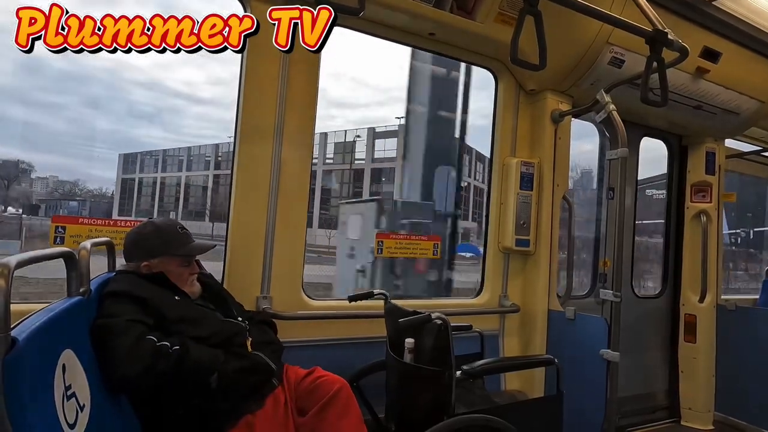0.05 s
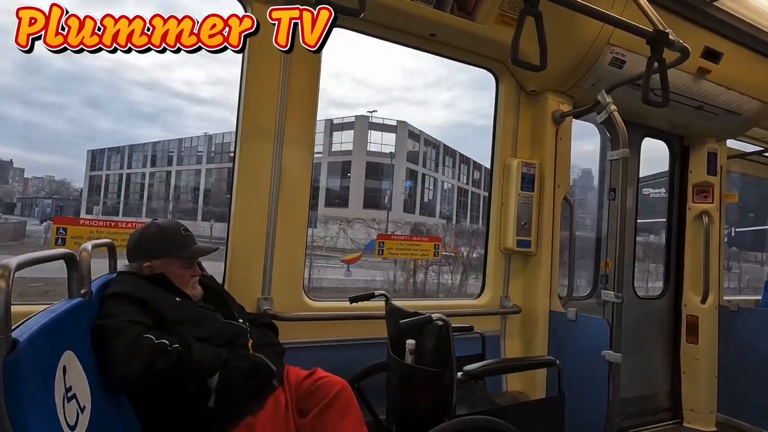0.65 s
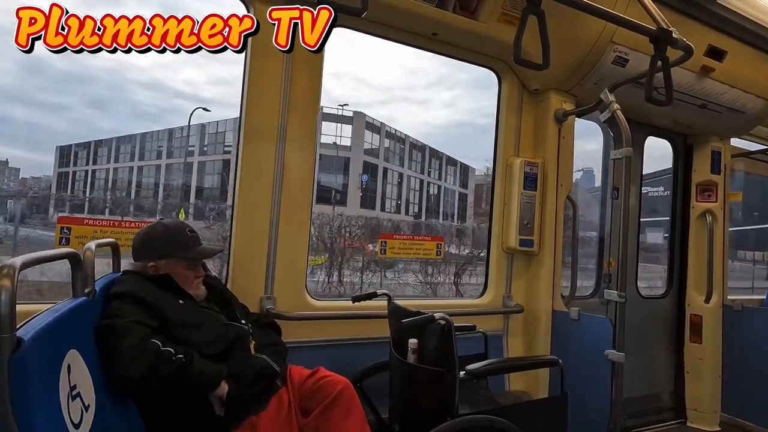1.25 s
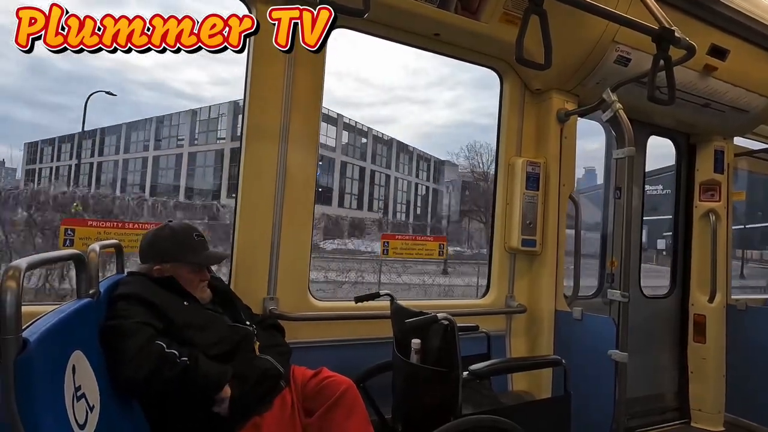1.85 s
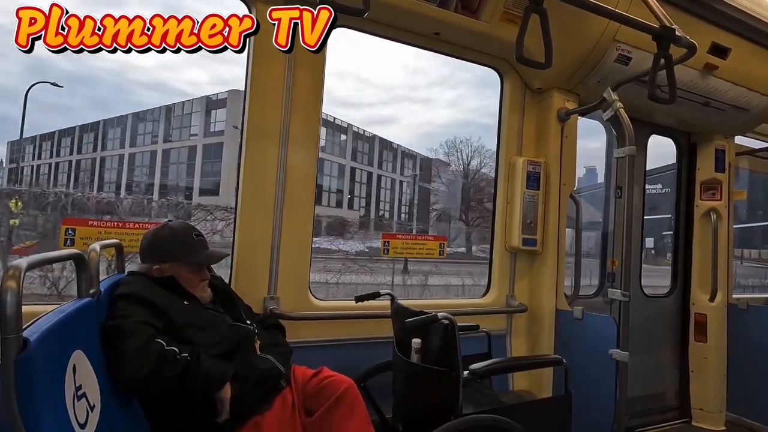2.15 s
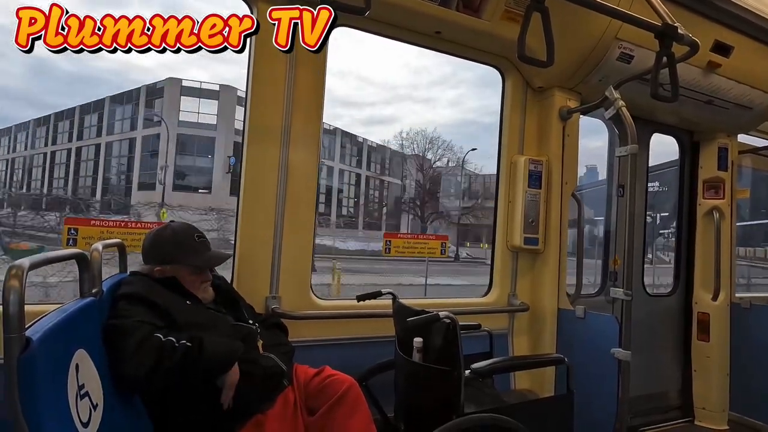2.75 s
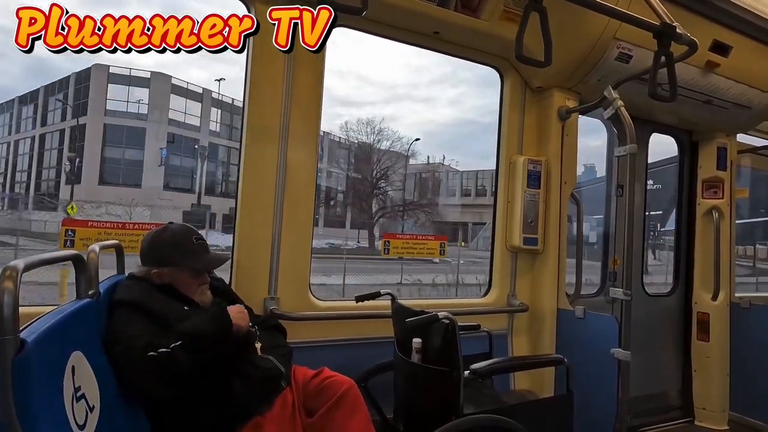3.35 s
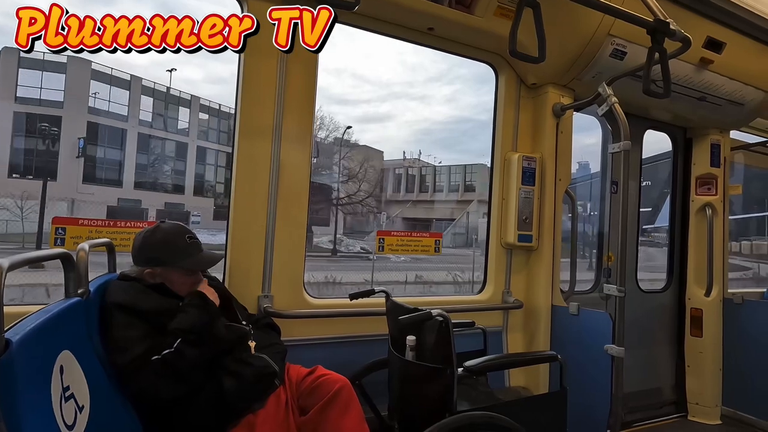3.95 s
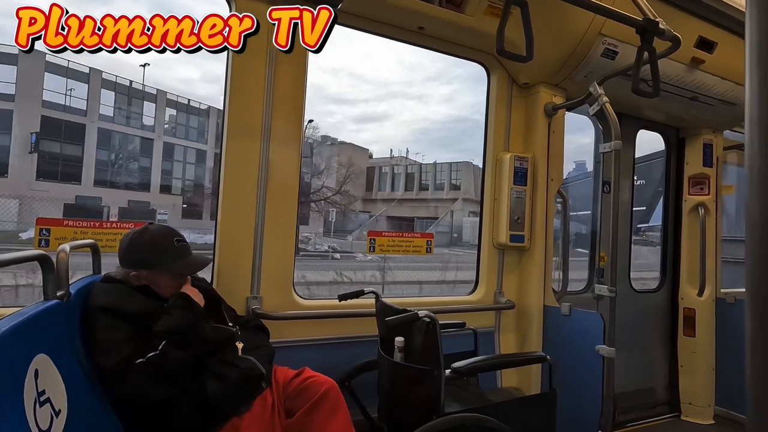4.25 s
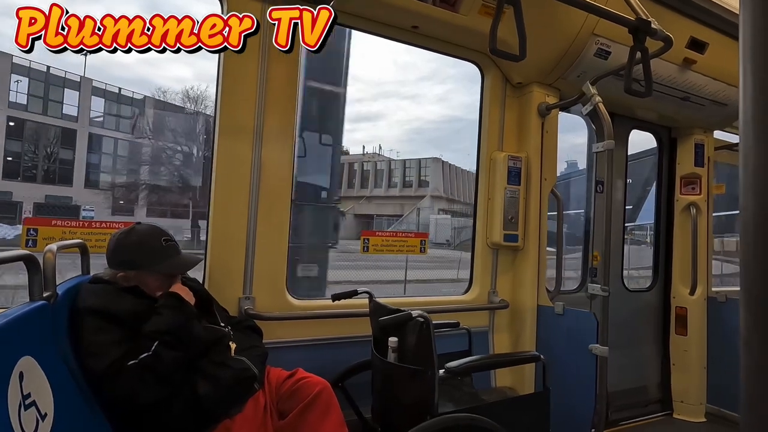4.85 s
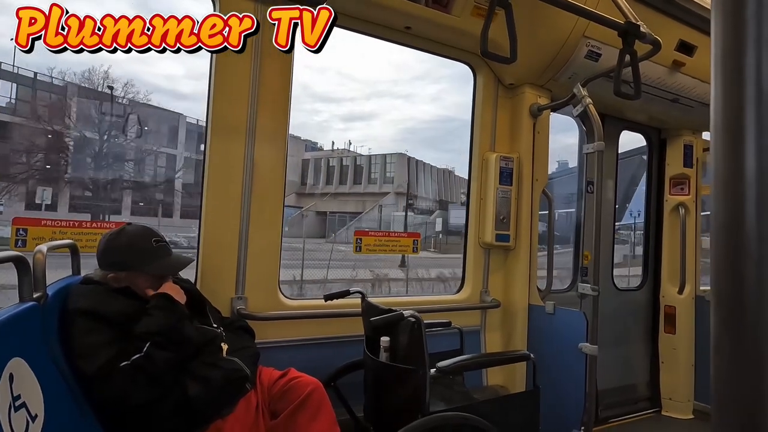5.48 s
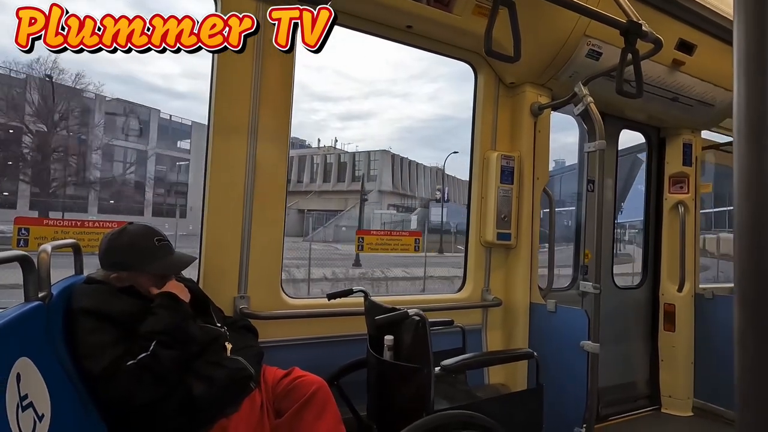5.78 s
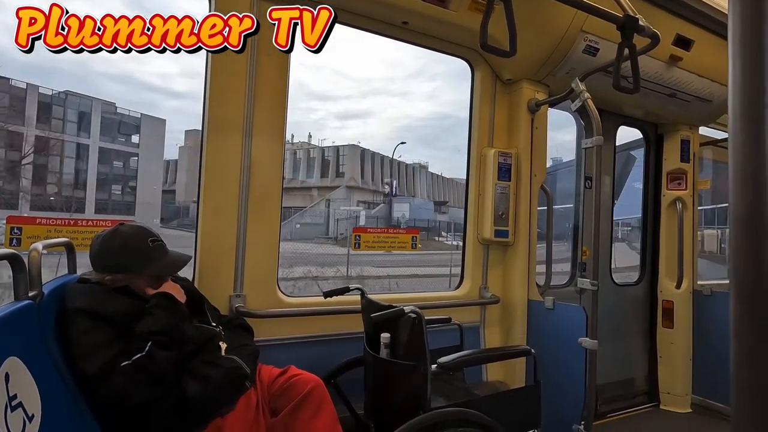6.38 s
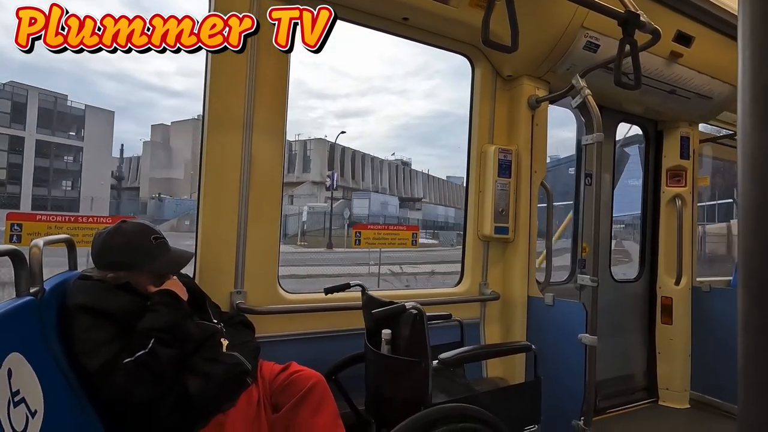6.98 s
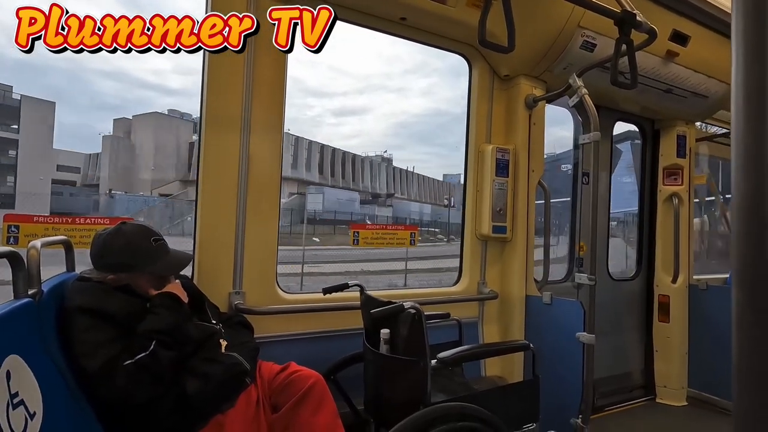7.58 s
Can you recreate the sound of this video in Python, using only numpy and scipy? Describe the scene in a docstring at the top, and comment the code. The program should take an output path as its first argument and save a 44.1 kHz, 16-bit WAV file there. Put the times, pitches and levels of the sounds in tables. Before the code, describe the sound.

A light rail car runs at steady speed, heard in stereo from inside the cabin. A deep, slowly swelling boom and rumble fills the whole stretch, with the roar and hiss of wheels on rails and a very faint, thin drive whine. From about 0.1 to 1.1 seconds loose fittings clack and rattle sharply, with small metal clinks around 0.3 seconds and the strongest knock, along with a floor thump, near 0.9. The trim gives a tiny squeak at 1.5 seconds and again near 5.6. The wheels cross rail joints in groups, each a clunk with a surge of roar, brief clatter and slight ring, at about 2.4 to 2.8, 4.1 to 4.4, 5.2 to 5.4 and 6.8 to 7.3 seconds. Dull floor thumps cluster around 3.6 to 3.9 and recur between 5.4 and 6.7. The rumble continues to the end, at about 7.6 seconds.

```python
"""Loose fittings clack and clink for a second over the deep boom of a light rail car at steady speed,
heard from a pair of microphones inside the cabin. The car body booms at two low resonances. Under the
floor the wheels roar, hiss and ring on the rails, surging and clunking as each axle crosses a joint,
and the drive whines faintly. Now and then a jolt thumps the floor or the trim gives a small squeak."""
import sys
import numpy as np
from scipy import signal
from scipy.fft import rfft, irfft, next_fast_len
from scipy.io import wavfile
from scipy.ndimage import uniform_filter1d

SR = 44100
rng = np.random.default_rng(int(sys.argv[2]) if len(sys.argv) > 2 else 0)


def digitize_waveform(pressure):
    """Quantize a signal to 16-bit integers and store it at the path in sys.argv[1].

    Rows of a 2-D input are taken as channels; values are limited to [-1, 1].
    """
    field = np.atleast_2d(pressure).T
    bounded = np.clip(field, -1, 1)
    quanta = np.round(bounded * 32767).astype(np.int16)
    wavfile.write(sys.argv[1], SR, quanta)


N = 336042
TIME = np.arange(N) / SR
JOINT_RISE_S, USUAL_ROAR_DB = 0.017, -35

# Roughness of the track between joints. Each row: time in seconds, then floor rumble, rail roar and
# contact hiss in dB. Levels in all tables are relative, ahead of each source's own gain.
TRACK_ROUGHNESS = [(0, -27, -32.5, -45), (0.6, -28, -33, -45), (1.1, -28, -34, -46.5),
                   (1.5, -27, -31.5, -42.5), (1.95, -39, -35, -46), (2.2, -29.5, -36, -49.0),
                   (2.75, -33, -35.5, -45.5), (3.05, -38.5, -37.5, -50), (3.5, -34.5, -37, -50),
                   (3.9, -30, -34.5, -46.5), (4.55, -31.5, -34, -47.0), (4.8, -33, -34.5, -47),
                   (5.05, -30.5, -34, -46.5), (5.65, -27.5, -34, -45), (6, -31, -36.5, -48.5),
                   (6.35, -25.5, -34, -46), (6.6, -28, -34, -48.5), (6.9, -27.5, -32, -40.5),
                   (7.4, -32.5, -35, -45.5), (7.62, -31, -40.5, -50)]
# Axles crossing rail joints. Each row: start in seconds, clunk in dB, its pitch in Hz, roar in dB,
# wheel ring in dB, its pitch in Hz, its hold in seconds, hiss in dB.
RAIL_JOINTS = [(2.372, -24.5, 254, -35, -41, 924, 0.23, -41),
               (2.583, -27.5, 280, -37.5, -37.5, 933, 0.054, -41),
               (2.78, -38.5, 252, -54, -50, 930, 0.058, -49),
               (4.135, -34, 340, -34.5, -44, 964, 0.03, -41.5),
               (4.345, -28.5, 295, -38.5, -37, 926, 0.05, -44),
               (5.165, -23.5, 213, -36.5, -39, 952, .13, -44.5),
               (5.368, -25, 237, -30.5, -41.5, 916, .12, -42.5),
               (6.18, -40, 250, -44, -54, 957, .04, -51.5), (6.37, -41, 254, -51, -55, 970, 0.058, -47),
               (6.84, -26, 254, -33.5, -36, 970, 0.05, -38),
               (6.934, -38, 300, -35, -42.5, 890, 0.13, -41.5),
               (7.05, -28.5, 304, -31.5, -38.5, 920, 0.04, -37),
               (7.245, -28.5, 215, -33, -38.5, 950, 0.056, -37.5)]


def body_boom():
    """All round the microphones the car shell swings at its two lowest resonances, with wandering phase."""
    # The shell's resonances. Each row: frequency in Hz, width in Hz.
    shell_modes = [(28.4, 7.3), (56.8, 11.8)]
    # Slow swell of each resonance. Each row: time in seconds, level in dB.
    lower_swell = [(0.0, -25), (0.12, -21.5), (1.43, -18), (1.64, -11.5), (2.18, -23.5), (2.8, -13),
                   (3.29, -26), (3.49, -18), (3.65, -20.5), (4.07, -14), (4.72, -22), (4.85, -26),
                   (5.05, -19), (5.44, -21), (5.61, -17.5), (6.58, -19.5), (7.45, -15), (7.62, -30.5)]
    upper_swell = [(0.0, -23), (0.22, -27), (0.6, -26.5), (1.56, -34.5), (1.72, -23), (1.92, -18.5),
                   (2.1, -24), (2.45, -18.5), (2.7, -21.5), (2.8, -28), (3.1, -22), (3.4, -23), (3.53, -29),
                   (3.65, -26), (4.02, -22), (4.46, -18.5), (4.58, -30), (4.93, -26), (5.05, -20.5),
                   (5.32, -14.5), (5.45, -24.5), (5.6, -21), (6.07, -29.5), (6.2, -17.5), (6.6, -24.5),
                   (6.75, -28.5), (6.88, -16.5), (7.28, -17), (7.42, -27.5), (7.62, -24)]
    looseness = 0.51  # the looser, the deeper the swing dips as its phase slips
    out = np.zeros((2, N))
    for (hz, width), swell in zip(shell_modes, (lower_swell, upper_swell)):
        mode = [(hz, width, 0)]
        swing = signal.hilbert(resonant(rng.standard_normal(N), mode))
        swing = unit_rms(swing.real / np.sqrt(abs(swing) ** 2 + looseness))
        side = gain_of(-45.5) * resonant(rng.standard_normal(N), mode)
        level_db = curve(swell) - 0.97 + 2.5 * drift(11.2)
        out += gain_of(level_db) * np.array([swing + side, swing - side])
    return out


def rolling():
    """Rough rail and joints shake the floor and roar through the shell; panels drone and wheels sing."""
    # Spectra of floor rumble, rail roar and the crash at a joint. Each row: frequency in Hz, level in dB.
    rumble_spectrum = [(39, -32.5), (66, -3.5), (86, -7), (108, -7.5), (250, -17.5), (320, -62.5),
                       (550, -120)]
    roar_spectrum = [(120, -5.5), (210, 1.5), (257, -6), (285, -2), (320, -4.5), (419, -8.5), (491, -7),
                     (555, -12), (667, -8), (734, -14.5), (837, -14), (954, -17.5), (1060, -14),
                     (1700, -27), (2210, -38), (3740, -120)]
    crash_spectrum = [(120, -14), (250, -2), (490, 2), (650, -4.5), (800, -6), (1200, -9.5), (1700, -23.5),
                      (3700, -52.5)]
    # Wall panel and wheel resonances. Each row: frequency in Hz, width in Hz, level in dB.
    panel_modes = [(260, 9.2, 0), (322.8, 55, -1), (479, 103, -9), (1370, 230, -13)]
    wheel_modes = [(908.5, 30, 0.5), (944.5, 26, 1.5), (987, 24, 0.5)]
    # Swell of the droning panels. Each row: time in seconds, level in dB.
    panel_swell = [(0, -35.5), (0.6, -39.5), (1.3, -39), (1.8, -34), (2.15, -43), (2.7, -34.5), (3.1, -46),
                   (3.55, -45.5), (3.95, -40.5), (4.4, -40.5), (4.8, -34.5), (5.1, -40), (5.6, -40),
                   (6.0, -42), (6.35, -39), (6.6, -42), (6.95, -37.5), (7.62, -45)]
    thuds = joint_surges(column=3)
    shake = np.hypot(roughness(column=1, patchy_db=2), gain_of(1) * thuds)
    rough = roughness(column=2, patchy_db=0.5)
    rumble = steadied(coloured(diffuse(N), rumble_spectrum), 0.043) * gain_of(0.3)
    roar = steadied(coloured(diffuse(N), roar_spectrum), 0.026) * gain_of(-0.75)
    crash = steadied(coloured(diffuse(N), crash_spectrum), 0.048)
    panels = steadied(resonant(diffuse(N), panel_modes), 0.2)
    panels *= gain_of(curve(panel_swell) + 1.3 * drift(30))
    wheels = steadied(resonant(diffuse(N), wheel_modes), 0.11)
    wheels *= gain_of(-50 + extra_roar_db() + 1.6 * drift(9))
    return rumble * shake + roar * rough + crash * thuds + panels + wheels


def joint_clunks():
    """At each joint the bogie clunks and the wheel rings, at a pitch that differs from blow to blow."""
    ring_lead_s = 0.012  # the wheel starts to sing just before it drops into the gap
    clunk_width_hz, ring_width_hz = 122, 84
    out, t = np.zeros((2, N)), np.arange(SR // 2) / SR
    for start, clunk_db, clunk_hz, _, ring_db, ring_hz, ring_hold_s, _ in RAIL_JOINTS:
        clunk = steadied(resonant(diffuse(len(t)), [(clunk_hz, clunk_width_hz, 0)]), 0.016)
        clunk *= jolt(t, JOINT_RISE_S, hold_s=0.011, t60=0.39)
        ring = steadied(resonant(diffuse(len(t)), [(ring_hz, ring_width_hz, 0)]), 0.043)
        ring *= jolt(t, JOINT_RISE_S, ring_hold_s, t60=0.28)
        add(out, start, gain_of(clunk_db) * clunk)
        add(out, start - ring_lead_s, gain_of(ring_db) * ring)
    return out


def gear_clatter():
    """Each joint shakes the running gear into a quick, uneven clatter under the floor."""
    # Resonances of the running gear. Each row: frequency in Hz, width in Hz, level in dB.
    gear_modes = [(560, 180, 0), (870, 250, 0), (1230, 260, -1.5), (1650, 380, -7), (2380, 550, -9)]
    taps_per_s, tap_t60 = 90, 0.088
    taps = (rng.random(N) < taps_per_s / SR) * gain_of(1.5 * rng.uniform(-1.1, 1, N))
    power_decay = gain_of(-60 / (tap_t60 * SR)) ** 2
    tap_power = signal.lfilter([1], [1, -power_decay], taps ** 2)
    clatter = unit_rms(np.sqrt(tap_power)) * resonant(diffuse(N), gear_modes)
    return gain_of(-10) * joint_surges(column=3) * clatter


def contact_hiss():
    """Steel on steel hisses, and grows brighter and grittier as it rubs harder."""
    # Spectra of the hiss and its grit. Each row: frequency in Hz, level in dB.
    hiss_spectrum = [(740, -8), (1250, -3.5), (1400, -2), (1710, -2), (4820, -14.5), (7350, -27),
                     (8550, -32), (12300, -41.5), (13900, -59.5)]
    grit_spectrum = [(1500, -21.5), (4000, 2), (7300, 4.5), (9000, -8), (10800, -12.5),
                     (12400, -12.5), (14000, -29.5)]
    scrapes = joint_surges(column=7, rise_s=0.037, t60=0.8)  # slower to swell than the clunk
    rub_db = 20 * np.log10(np.hypot(roughness(column=3, patchy_db=-0.65), scrapes))
    hiss = coloured(diffuse(N), hiss_spectrum) * gain_of(rub_db + 1 + 0.5 * drift(25))
    grit = coloured(diffuse(N) * gain_of(1.7 * drift(300)), grit_spectrum)
    return hiss + grit * gain_of(-57.5 + 1.7 * (rub_db + 41))


def fitting_clacks():
    """Loose fittings knock in the cabin: each a crack, a short uneven rattle and their echo."""
    # The knocks. Each row: start in seconds, level in dB, tilt in dB per octave, ringing band in Hz,
    # its boost in dB, rattle t60 in seconds.
    knocks = [(0.1147, -19.5, 4, 4600, 4.5, 0.023), (0.1228, -20, -2, 3000, 2, 0.16),
              (0.2125, -24, 1.5, 3660, -1, 0.022), (0.2834, -19.5, 1, 1960, -5, 0.06),
              (.3288, -25.5, 3, 1378, -10, 0.05), (0.3557, -23.5, -0.5, 1136, -1, 0.07),
              (0.4023, -22.5, 1.5, 2860, 4, 0.016), (0.7293, -32, -1, 4200, 1, 0.072),
              (0.7579, -31.5, 2, 4630, 11, 0.07), (0.8883, -16, -2.8, 1900, 4.5, 0.049),
              (.8970, -17.5, 2, 2620, 11.5, 0.13), (0.929, -21, -1, 2400, 7, 0.38),
              (1.0323, -18.5, -0.5, 3080, 4.5, 0.1), (1.178, -33.5, -4, 4000, 7, .06)]
    # Spectrum common to all knocks. Each row: frequency in Hz, level in dB.
    knock_spectrum = [(150, -15), (400, 3), (800, 2.5), (1400, 6), (2800, 1.5), (4500, -2), (7000, -12),
                      (9000, -16), (11000, -24.5), (12200, -26.5), (15000, -45)]
    # Resonances of the knocked panel. Each row: frequency in Hz, width in Hz, boost in dB.
    panel_peaks = [(950, 32, 10), (1390, 60, 3), (1794, 30, 4), (2140, 49, 4.5), (2770, 45, 5),
                   (3210, 60, 6), (4400, 100, 1), (4760, 110, 2)]
    out, t = np.zeros((2, N)), np.arange(SR // 2) / SR
    hz = np.fft.rfftfreq(len(t), 1 / SR)
    attack, snap = 1 - np.exp(-t / 0.00013), 0.21 * np.exp(-t / 0.0023)
    panel_db = sum(boost / (1 + (2 * (hz - centre) / width) ** 2) for centre, width, boost in panel_peaks)
    bounce = gain_of(1.5 * drift(170))  # a fitting bounces unevenly in its seat
    for start, db, tilt_db, band_hz, boost_db, t60 in knocks:
        band_db = boost_db * np.exp(-(np.log2((hz + 1) / band_hz) / 0.75) ** 2)
        slope_db = tilt_db * np.log2((hz + 100) / 3000)
        colour = gain_of(at_hz(knock_spectrum, hz) + slope_db + band_db + panel_db)
        near, far = (irfft(rfft(diffuse(len(t))) * colour, len(t)) for _ in range(2))
        rattle = bounce[round(start * SR):][:len(t)] * gain_of(-60 * t / t60)
        crack = unit_rms(near * attack * (rattle + snap))
        add(out, start, gain_of(db - 21) * crack + gain_of(db - 17) * echo_tail(far))
    # the knocks come from one direction, a touch to the left, so both microphones hear them more alike
    mid = out.mean(0)
    return (mid + 0.76 * (out - mid)) * gain_of([[0.3], [-0.3]])


def metal_clinks():
    """A loose metal part rings while it chatters in its seat, which blurs each mode into a narrow band."""
    # The lowest note depends on where the part lands. Each row: start in seconds, level in dB,
    # lowest note in Hz, that note against the rest in dB, tilt in dB per octave.
    landings = [(0.2834, -36, 1534, 10, 1.5), (0.2874, -37, 1947, 10, 3), (0.3288, -22.5, 1377, 3, 0.5),
                (0.3557, -26.5, 1137, -10, -6.5), (0.385, -30, 1320, -15, -9)]
    # The part's upper modes. Each row: frequency in Hz, width in Hz, level in dB, t60 in seconds.
    upper_modes = [(3545, 8, -1.5, 0.25), (3630, 88, -4, 0.078), (3850, 140, -9, 0.05),
                   (5150, 150, -13, 0.04), (5860, 60, -12, 0.08), (6240, 40, -15, 0.15),
                   (7000, 260, -7.5, 0.072), (7600, 150, -18, 0.05)]
    low_width_hz, low_t60 = 13, 0.12
    out, t = np.zeros((1, N)), np.arange(SR // 3) / SR
    for start, db, low_hz, low_db, tilt_db in landings:
        for hz, width, mode_db, t60 in upper_modes + [(low_hz, low_width_hz, low_db, low_t60)]:
            jitter = uniform_filter1d(rng.standard_normal(len(t)), size=24)
            phase_slip = np.cumsum(jitter) * np.sqrt(2 * np.pi * width / SR)
            tone = np.sin(2 * np.pi * (hz * t + rng.random()) + phase_slip)
            level_db = db + mode_db + tilt_db * np.log2(hz / 3500)
            add(out, start, gain_of(level_db) * tone * jolt(t, rise_s=0.0005, hold_s=0.006, t60=t60))
    out *= gain_of(3 * drift(160))  # the buzz of the chatter
    return out + gain_of(-10) * cabin_echo(out)


def floor_thumps():
    """Jolts from below make the floor drum for a few cycles; neighbouring panels rumble on briefly."""
    # The jolts. Each row: start in seconds, level in dB, pitch in Hz.
    thumps = [(0.1, -18, 103), (0.896, -12.5, 144.5), (3.611, -16.5, 141), (3.745, -17, 139),
              (3.807, -18.5, 112), (3.847, -21, 171), (5.40, -25, 148.5), (5.80, -16.5, 93.5),
              (6.334, -22, 137), (6.732, -19, 110)]
    rumble_width_hz = 95
    out, t = np.zeros((2, N)), np.arange(SR // 3) / SR
    envelope = (1 - np.exp(-t / 0.0073)) * gain_of(-60 * t / 0.15)
    for start, db, hz in thumps:
        rumble = steadied(resonant(diffuse(len(t)), [(hz, rumble_width_hz, 0)]), 0.025)
        rumble *= jolt(t, rise_s=0.0099, hold_s=0.01, t60=0.28)
        tone = envelope / envelope.max() * np.sin(2 * np.pi * hz * t)
        add(out, start, gain_of(db) * (0.85 * tone + gain_of(-8.5) * rumble))
    return out


def trim_squeaks():
    """Interior trim rubs and squeaks briefly, rough or thin, in two bands at once."""
    # The rubs. Each row: start in seconds, level in dB, length in seconds, lower and upper band in Hz,
    # upper band's level in dB, width as a share of the pitch.
    rubs = [(1.515, -42.5, 0.058, 3780, 6800, -8.5, 0.14), (5.56, -44, 0.056, 1465, 4900, -8, .05),
            (5.623, -48, 0.04, 1420, 4920, -11, 0.06)]
    out, t = np.zeros((2, N)), np.arange(SR // 4) / SR
    for start, db, length, low_hz, high_hz, upper_db, width in rubs:
        swell = np.sin(np.pi * np.minimum(t / length, 1))
        bands = [(low_hz, low_hz * width, 0), (high_hz, high_hz * width, upper_db)]
        add(out, start, gain_of(db) * swell * resonant(diffuse(len(t)), bands))
    return out + gain_of(-2.5) * cabin_echo(out)


def drive_whine():
    """The electric drive's thin tone, far back in the mix, wavers with the shaking of the car."""
    # The drive's tone. Each row: pitch in Hz, level on ordinary track in dB.
    tones = [(985, -53)]
    out = np.zeros(N)
    for hz, db in tones:
        cycles = np.cumsum(hz + 9 * drift(22)) / SR
        level_db = db + 2.2 * drift(3.5) + 2 * drift(45)
        out += gain_of(level_db) * np.sqrt(2) * np.sin(2 * np.pi * cycles)
    return out * gain_of(0.54 * extra_roar_db())


def cabin_echo(x):
    """The echo of x in the cabin, without the direct sound."""
    tail = echo_tail(diffuse(SR))
    return signal.fftconvolve(x, tail / np.linalg.norm(tail[0]), axes=1)[:, :N]


def echo_tail(noise):
    """Turns noise into dense echoes off windows and panels, the treble dying first."""
    # The cabin's decay. Each row: frequency in Hz, t60 in seconds.
    cabin_t60 = [(150, 1), (1000, 0.75), (3000, 0.49), (6000, 0.35), (12000, 0.28)]
    hz, t, frames = signal.stft(noise, SR, nperseg=256)
    decay = gain_of(-60 * t / at_hz(cabin_t60, hz)[:, None])
    tail = signal.istft(frames * decay, SR, nperseg=256)[1][:, :noise.shape[1]]
    onset = np.clip(np.arange(tail.shape[1]) / SR / 0.0036, 0, 1)
    return unit_rms(tail * onset)


def diffuse(size):
    """White noise from all round the cabin: alike at both microphones in the bass, less so higher up."""
    # Coherence of the pair. Each row: frequency in Hz, left-right likeness from 0 to 1.
    coherence = [(60, 1.0), (120, 1.0), (230, 1), (460, 0.92), (900, 0.8), (1760, 0.56), (3470, 0.59),
                 (6820, 0.67), (13400, 0.4)]
    padded = next_fast_len(size)
    likeness = at_hz(coherence, np.fft.rfftfreq(padded, 1 / SR))
    mid, side = rfft(rng.standard_normal((2, size)), padded)
    mid *= np.sqrt((1 + likeness) / 2)
    side *= np.sqrt((1 - likeness) / 2 + gain_of(-39) ** 2)  # the two never agree fully
    return irfft(np.array([mid + side, mid - side]), padded)[:, :size]


def joint_surges(column, rise_s=JOINT_RISE_S, hold_s=0.017, t60=0.71):
    """Gain of all the jolts at the rail joints, summed in power, for one level column."""
    surges = (gain_of(row[column]) * jolt(TIME - row[0], rise_s, hold_s, t60) for row in RAIL_JOINTS)
    return np.sqrt(sum(surge ** 2 for surge in surges))


def roughness(column, patchy_db):
    """Gain from the running surface: its slow trend with random rough patches."""
    return gain_of(curve(TRACK_ROUGHNESS, column) + patchy_db * drift(13))


def extra_roar_db():
    """How far the trend of the rail roar lies above that of ordinary track."""
    return curve(TRACK_ROUGHNESS, column=2) - USUAL_ROAR_DB


def jolt(t, rise_s, hold_s, t60):
    """Gain of one blow: it rises, holds and dies away."""
    return np.clip(t / rise_s, 0, 1) * gain_of(-60 * np.maximum(t - rise_s - hold_s, 0) / t60)


def drift(rate_hz):
    """Random wander of rms 1, mostly slower than rate_hz."""
    return filtered(rng.standard_normal(N), lambda hz: 1 / (1 + (hz / rate_hz) ** 4))


def coloured(x, spectrum):
    """Shapes x by a list of (Hz, dB) points, at rms 1."""
    return filtered(x, lambda hz: gain_of(at_hz(spectrum, hz)))


def resonant(x, modes):
    """Passes x through steep-sided resonances (Hz, width in Hz, dB), at rms 1."""
    return filtered(x, lambda hz: sum(gain_of(db) / np.sqrt(width) / (1 + 2j * (hz - centre) / width) ** 2
                                      for centre, width, db in modes))


def filtered(x, response):
    """Filters x by a function of frequency and scales it to rms 1."""
    size = next_fast_len(x.shape[-1])
    spectrum = rfft(x, size) * response(np.fft.rfftfreq(size, 1 / SR))
    return unit_rms(irfft(spectrum, size)[..., :x.shape[-1]])


def steadied(x, span_s):
    """Holds the slow level of a noise even, leaving its quick flutter."""
    power = uniform_filter1d((x ** 2).mean(0), int(span_s * SR))
    return x / np.sqrt(abs(power) + 1e-6)


def at_hz(points, hz):
    """Joins (Hz, value) points by straight lines over log frequency."""
    point_hz, values = np.transpose(points)
    return np.interp(np.log(hz + 1), np.log(point_hz + 1), values)


def curve(rows, column=1):
    """One column of a timed table at every sample."""
    rows = np.array(rows)
    return np.interp(TIME, rows[:, 0], rows[:, column])


def add(mix, start_s, sound):
    part = mix[:, max(round(start_s * SR), 0):][:, :sound.shape[-1]]
    part += sound[..., :part.shape[1]]


def gain_of(db):
    return 10 ** (np.asarray(db) / 20)


def unit_rms(x):
    return x / np.sqrt(np.mean(x ** 2) + 1e-20)


def scene():
    """The running noise of the car, with the small sounds of the cabin on top."""
    running = body_boom() + rolling() + joint_clunks() + gear_clatter() + contact_hiss() + drive_whine()
    return running + fitting_clacks() + metal_clinks() + floor_thumps() + trim_squeaks()


def record(dry):
    """The left microphone takes more treble, long waves reach both alike, and the top ends at 14.3 kHz."""
    # Balance of the pair. Each row: frequency in Hz, left minus right in dB.
    balance = [(600, 1.9), (1320, 2), (2860, 1), (6200, 1), (10000, 1.5), (12500, 7)]
    hz = np.fft.rfftfreq(N, 1 / SR)
    lean_db = at_hz(balance, hz) * hz ** 4 / (hz ** 4 + 450.0 ** 4)
    heard = irfft(rfft(dry) * gain_of(np.array([lean_db, -lean_db]) / 2), N)
    lowpass = signal.firwin(511, 14300, window=("kaiser", 9), fs=SR)
    return signal.oaconvolve(heard, lowpass[None], "same")


dry = scene()
out = record(dry)
digitize_waveform(out)
```